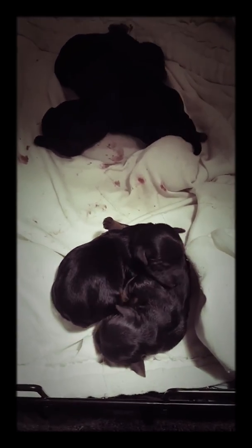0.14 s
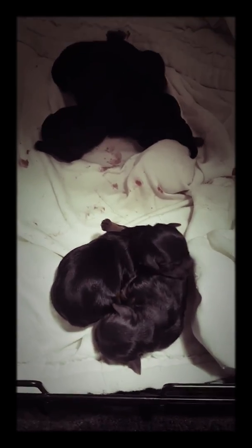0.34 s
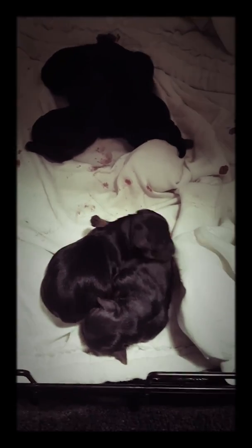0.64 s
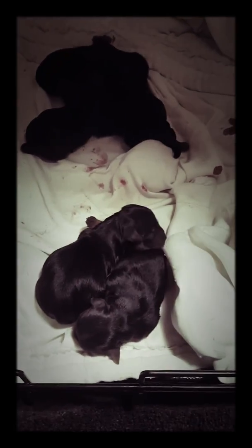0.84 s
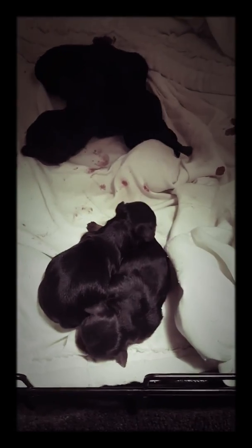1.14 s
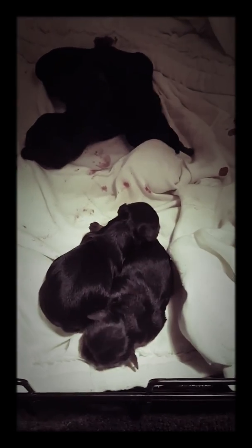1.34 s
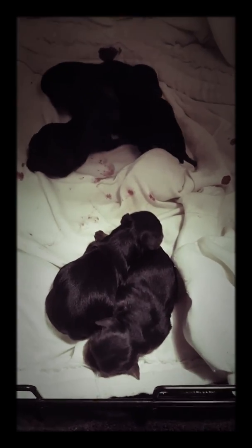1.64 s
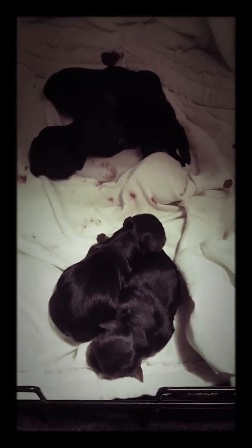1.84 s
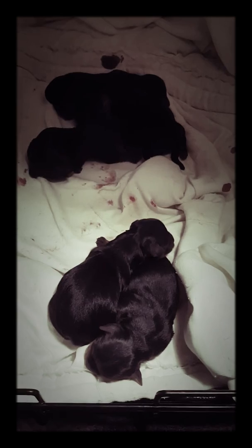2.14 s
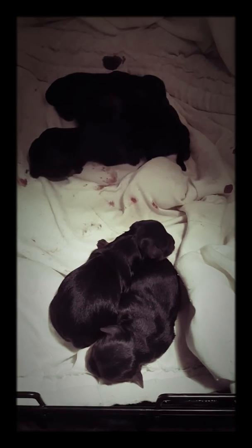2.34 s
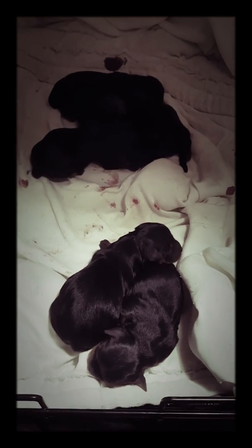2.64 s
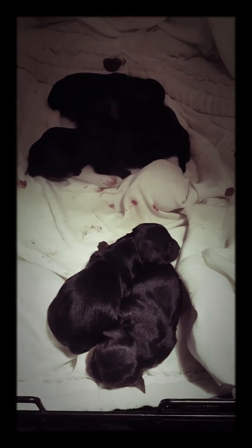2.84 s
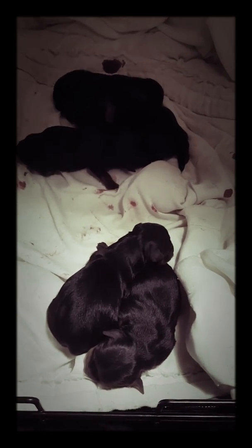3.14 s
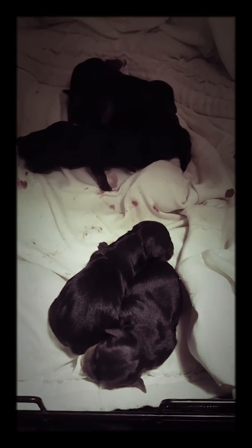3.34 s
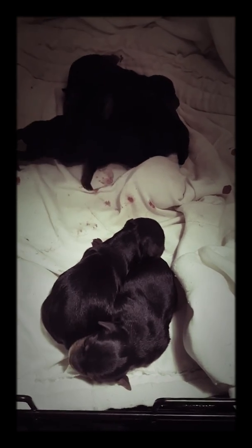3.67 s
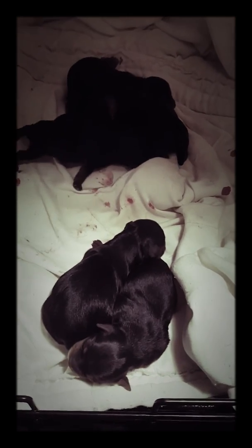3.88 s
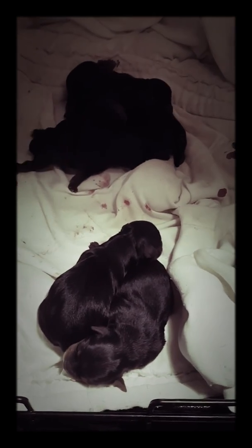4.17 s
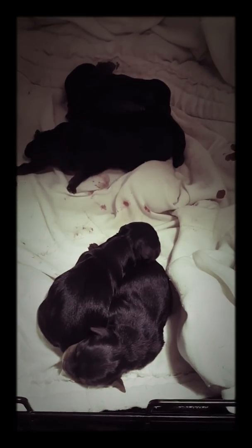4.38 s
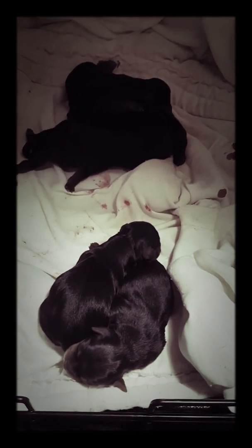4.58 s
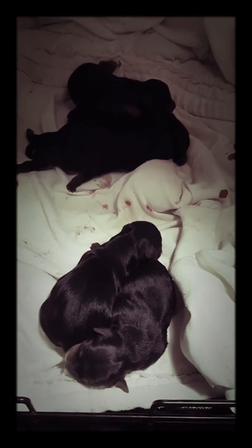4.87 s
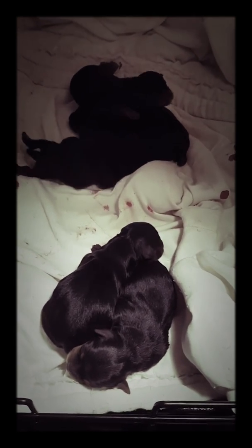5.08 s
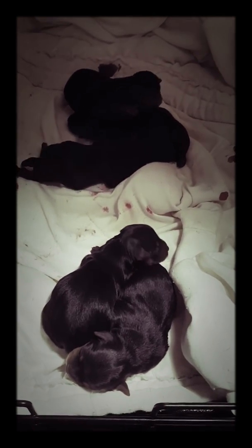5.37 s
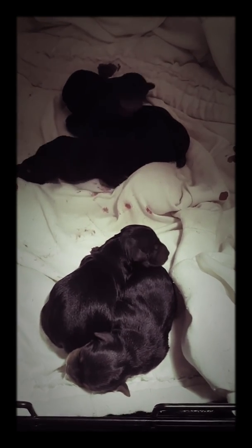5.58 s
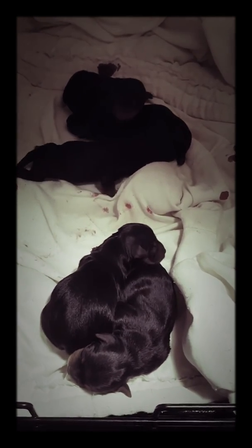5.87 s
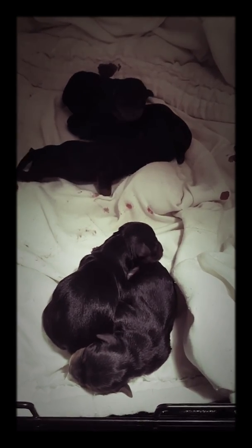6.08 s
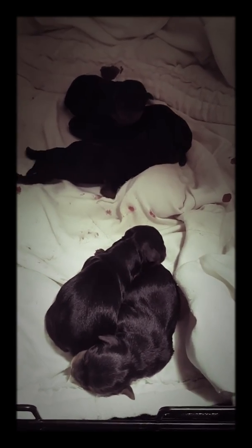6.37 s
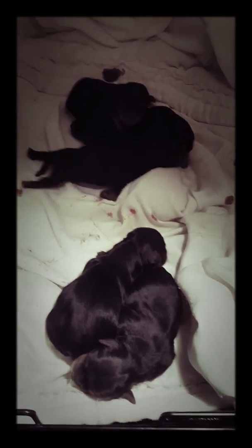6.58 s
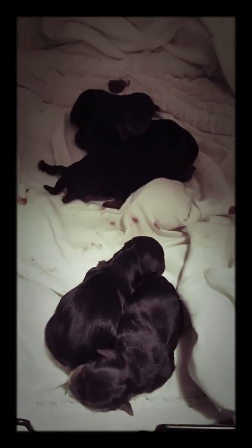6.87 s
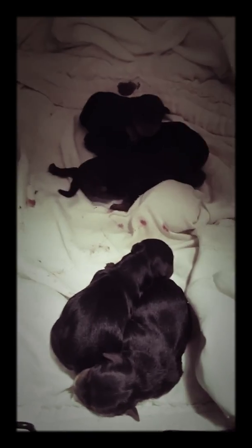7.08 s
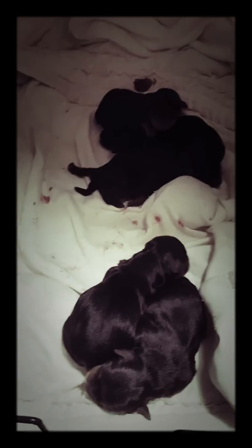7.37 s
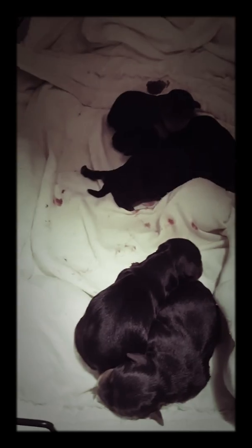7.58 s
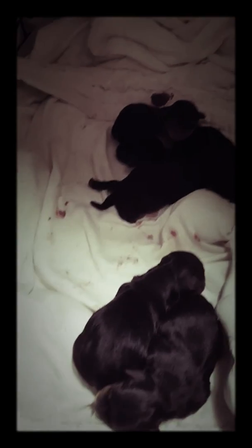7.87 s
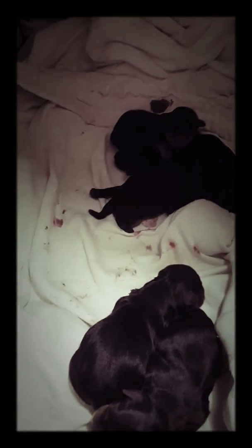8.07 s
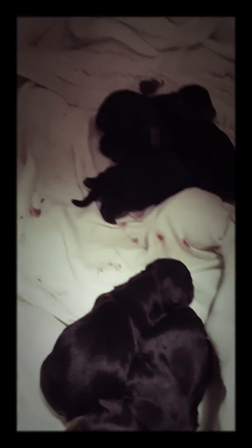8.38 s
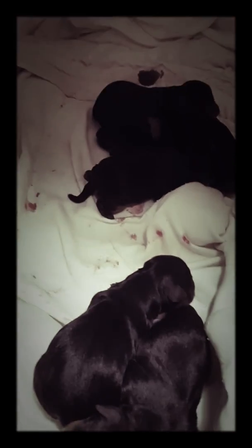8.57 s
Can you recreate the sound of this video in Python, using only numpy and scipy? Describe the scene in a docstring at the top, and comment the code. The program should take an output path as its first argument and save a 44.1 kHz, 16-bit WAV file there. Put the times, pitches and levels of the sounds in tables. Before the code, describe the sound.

A very young puppy whines in wavering whistle-like yelps, littermates chirping in briefly, close up in a quiet room with low hum and small thuds.

```python
"""One newborn puppy cries in gliding whistles that jump, split into half tones and break into rasp.
Littermates join in on bedding, an arm's length from a hand-held phone in a quiet room.
The voices are sums of partials weighted by a fixed colour; the rasps are uneven pulses ringing mouth and throat.
Bedding rustles as bursts of hiss, and bumps on the phone are ringing thuds with ticks.
Wavering mains hum, low rumble and wide room noise lie underneath."""
import sys
import numpy as np
from scipy import signal
from scipy.fft import rfft, irfft
from scipy.io import wavfile
from scipy.ndimage import uniform_filter1d, map_coordinates

SR = 44100
rng = np.random.default_rng(int(sys.argv[2]) if len(sys.argv) > 2 else 0)


def int16_out(signal):
    """Quantize to a 16-bit WAV file."""
    q = np.round(np.clip(np.atleast_2d(signal).T, -1, 1) * 32767)
    wavfile.write(sys.argv[1], SR, q.astype(np.int16))


def boost(x):
    """Linear amplitude factor 10**(x/20) for a level x in decibels (scalar or array-like)."""
    u = np.asarray(x, float) / 20
    return 10 ** u


N = 384552
T = np.arange(N) / SR
HZ = np.fft.rfftfreq(N, 1 / SR) + 1  # 1 Hz up, so that its logarithm exists


def on_log(hz, table):
    """Read a (Hz, value) table on a log-frequency axis."""
    table_hz, value = np.transpose(table)
    return np.interp(np.log(hz), np.log(table_hz), value)


def level(x, db):
    """Scale to an rms level in dB."""
    return x * boost(db) / np.sqrt(np.mean(x ** 2))


def noise(table):
    """Noise of rms 1 whose spectrum follows a (Hz, dB per Hz) table."""
    white = rng.standard_normal(N)
    return level(irfft(rfft(white) * boost(on_log(HZ, table)), N), 0)


def walk(rate):
    """Smooth chance that changes about rate times a second; rms 1."""
    k = max(int(SR / rate), 2)
    return level(uniform_filter1d(uniform_filter1d(rng.standard_normal(N), k), k), 0)


def envelope(tables, edge=0.00055):
    """Gain from (s, dB) tables, silent outside them, smoothed over edge seconds."""
    gain = np.zeros(N)
    for rows in tables:
        s, db = np.transpose(rows)
        a, b = int(s[0] * SR), int(s[-1] * SR)
        gain[a:b] += boost(np.interp(T[a:b], s, db))
    return uniform_filter1d(gain, int(edge * SR))


def glide(t, rows):
    """Smooth pitch through (s, Hz) rows by cubic pieces, level at each turning point."""
    s, hz = np.transpose(sorted(rows))
    step = np.maximum(np.diff(s), 1e-4)
    slope = np.diff(hz) / step
    # harmonic mean of the neighbouring slopes, zero where the pitch turns
    product = np.maximum(slope[1:] * slope[:-1], 0)
    inner = 2 * product / (slope[1:] + slope[:-1] + 1e-9)
    tangent = np.r_[slope[0], inner, slope[-1]]
    i = np.clip(np.searchsorted(s, t) - 1, 0, len(step) - 1)
    u = np.clip((t - s[i]) / step[i], 0, 1)
    bend = (1 - u) * (tangent[i] - slope[i]) - u * (tangent[i + 1] - slope[i])
    return hz[i] + step[i] * u * (slope[i] + (1 - u) * bend)


def voice(a, hz, db, rough, half, bright_db, tremble, shimmer, drift):
    """One whistle-like cry from sample a: partials on the pitch, weighted by the colour of the cries."""
    # Colour of the cries as heard: strongest near 1700 Hz, almost nothing around 5200 Hz.
    # Each row: Hz, relative dB.
    colour = [(450, -6), (800, 4), (1200, 10.5), (1700, 14), (2400, 7), (3200, 4), (3900, -2), (4700, -1.5),
              (5200, -36.5), (6800, -19), (12000, -73)]
    # Muzzles turn away from the phone. Each row: seconds, dB lost per octave of partials.
    dull = [(.2, 14.5), (.8, 2), (1.3, 16), (2.2, 7), (7.2, 8)]
    upper_db_per_octave, thin_hz = -4, 800  # above this pitch the partials from the third up thin out
    swell_db, fade_s = 2.5, .003
    b = a + len(hz)
    t = T[a:b]
    # rough folds wobble in period and in strength, and their pitch strays
    stray = rough * (.08 * tremble[a:b] + .1 * drift[a:b])
    phase = 2 * np.pi * np.cumsum(hz * (1 + stray)) / SR
    k = np.arange(1, 15)[:, None]  # partial numbers
    partial_db = on_log(k * hz, colour) + bright_db * (k > 1)
    partial_db += upper_db_per_octave * np.log2(np.maximum(hz / thin_hz, 1)) * (k > 2)
    partial_db -= np.interp(t[0], *np.transpose(dull)) * np.log2(k)
    # the mouth keeps moving, so each partial swells and fades by itself
    partial_db += swell_db * drift[(np.arange(a, b) + N // 37 * k) % N]
    size = boost(partial_db)
    wave = -np.sum(size * np.sin(k * phase), axis=0)
    wave = wave / np.sqrt(np.sum(size ** 2, axis=0) / 2)
    # strong-weak alternation of cycles adds half tones
    wave = wave * (1 + 2 * half * np.cos(phase / 2)) * (1 + rough * shimmer[a:b])
    fade = np.clip(np.minimum(t - t[0], t[-1] - t) / fade_s, 0, 1)
    return boost(db) * wave * fade


def voice_breaks():
    """Roughness and half-tone share over time, as the nearest voice slides out of its clear tone."""
    # Each row: start in seconds, length in seconds, roughness (0-1), share (0-1) of strong-weak alternation.
    breaks = [(.23, .04, .12, .2), (.275, .1, .22, .35), (.42, .12, .55, .3), (.97, .36, .1, .03),
              (1.33, .05, .12, .05), (1.5, .085, .4, .6), (1.585, .17, .14, .6), (1.76, .15, .16, .1),
              (4.52, .08, .04, .12), (4.715, .09, .04, .15), (4.88, .19, .16, .1), (5.515, .11, .18, .8),
              (5.63, .12, .1, .06), (5.97, .08, .2, .12), (6.13, .09, .22, .45), (6.22, .045, .35, .3),
              (6.27, .15, .12, .05), (6.63, .07, .18, .1), (6.73, .06, .14, 0), (6.8, .05, .25, .2),
              (7.18, .12, .2, .1), (7.4, .15, .1, .04), (7.78, .12, .16, .08), (7.9, .04, .08, .16),
              (7.95, .11, .14, .25), (8.06, .15, .12, .05), (8.495, .12, .3, .25)]
    clear_rough, clear_half, slide_s = .05, .01, .03
    rough, half = np.full(N, clear_rough), np.full(N, clear_half)
    for s, length, break_rough, break_half in breaks:
        a, b = int(s * SR), int((s + length) * SR)
        rough[a:b] = break_rough
        half[a:b] = break_half
    return uniform_filter1d([rough, half], int(slide_s * SR))


def nearest_puppy(wobble):
    """Gliding cries driven by effort, with brief surges that are louder and brighter or duller."""
    # One table a cry, each row a turning point: seconds, pitch in Hz.
    # Rows a few ms apart are a leap of register.
    pitch = [
        [(.15, 1004), (.19, 1236), (.228, 1554), (.261, 1530), (.3, 1100), (.345, 865)],
        [(.3, 612), (.369, 646.5), (.41, 817), (.432, 601), (.52, 514)],
        [(.795, 949), (.81, 1144), (.902, 1915), (.93, 1690), (.99, 676.4), (1.019, 545), (1.06, 582),
         (1.12, 542), (1.209, 753), (1.25, 732), (1.311, 797), (1.335, 736), (1.341, 626), (1.356, 657),
         (1.388, 580)],
        [(1.513, 434), (1.62, 457.4), (1.755, 429)],
        [(1.73, 529), (1.79, 641), (1.848, 738), (1.856, 592), (1.883, 636), (1.89, 810), (1.912, 760)],
        [(2.18, 802), (2.268, 1370), (2.274, 1512), (2.303, 1610), (2.307, 1147), (2.332, 1100), (2.369, 840),
         (2.405, 775)],
        [(2.67, 682), (2.719, 714), (2.778, 1153), (2.826, 1310), (2.83, 1526), (2.857, 1490), (2.861, 1120),
         (2.888, 1138), (2.93, 795)],
        [(3.215, 691), (3.249, 766), (3.349, 1488), (3.389, 1559), (3.42, 1502), (3.44, 1053), (3.47, 922),
         (3.525, 712)],
        [(3.772, 563), (3.798, 661), (3.893, 934), (4.009, 759), (4.122, 1055), (4.2, 927), (4.251, 958),
         (4.297, 859)],
        [(4.53, 750), (4.572, 860), (4.658, 1419), (4.663, 1572), (4.706, 1493), (4.712, 1240), (4.741, 1047),
         (4.801, 922), (4.881, 982), (4.931, 814), (4.979, 728), (5.06, 511)],
        [(5.305, 718), (5.329, 1270), (5.335, 1135), (5.392, 1380), (5.398, 1672), (5.461, 1908), (5.49, 1554),
         (5.518, 951), (5.552, 829), (5.618, 719), (5.678, 564), (5.718, 710), (5.755, 623)],
        [(5.97, 814), (5.985, 1180), (6.0, 1194), (6.047, 1359), (6.052, 1605), (6.099, 1719), (6.118, 1584),
         (6.143, 1022), (6.21, 742), (6.263, 595.5), (6.345, 460.6), (6.374, 621), (6.43, 756)],
        [(6.572, 1438), (6.589, 1058), (6.627, 1005)],
        [(6.64, 662), (6.675, 451), (6.7, 390)],
        [(6.738, 388), (6.77, 501), (6.823, 667), (6.829, 813), (6.875, 720)],
        [(7.082, 1184), (7.099, 1120), (7.133, 1202), (7.181, 1061), (7.22, 737), (7.252, 570)],
        [(7.24, 604), (7.281, 769), (7.32, 1030), (7.363, 1194), (7.41, 1087), (7.489, 687), (7.548, 632)],
        [(7.764, 1499), (7.773, 1090), (7.82, 1222), (7.841, 1163), (7.896, 1360), (7.901, 1603), (7.935, 1590),
         (7.941, 1235), (7.978, 1077), (8.02, 748), (8.06, 611), (8.167, 445.5), (8.21, 810)],
        [(8.404, 1507), (8.411, 1063), (8.463, 1246), (8.471, 1400), (8.51, 955), (8.551, 767), (8.59, 509),
         (8.621, 770), (8.665, 800)],
    ]
    # Each row, one a cry: effort in dB at start, middle and end, before the gains below;
    # then mouth opening as dB of the overtones at start and end.
    effort = [(-31, -46, -36, 17, 16), (-47.5, -41.5, -52, -17, 15.5), (-37.5, -43.5, -41, 5, 0.5),
              (-52.5, -57, -50.5, 6, -4), (-43.5, -41, -50.5, 10, -2.5), (-36.5, -33, -39, 1.5, -3),
              (-47, -32.5, -33.5, 2.5, -4), (-40, -32, -47, 5.5, 12.5), (-35, -32.5, -34, 0, 8.5),
              (-34.5, -36, -37.5, 7.5, 9.5), (-35.5, -41.5, -40.5, 8, 2.5), (-36, -37, -38, 6, 3),
              (-42, -41, -42, 6, 1), (-39, -45.5, -41, -5, 4), (-40, -46.5, -43, -2.5, -20),
              (-34, -42, -46, 4, 1), (-39, -33, -36.5, -2, -6), (-33.5, -39.5, -40, 8, -8),
              (-34.5, -41, -39.5, 8, -13.5)]
    # The same effort sounds loudest on notes near 1300 Hz. Each row: pitch in Hz, gain in dB.
    pitch_gain = [(450, -3), (1000, -3.5), (1300, 1.5), (1900, 0.5)]
    # Brief surges, each louder with brighter or duller overtones.
    # Each row: centre in seconds, louder by dB, overtones changed by dB.
    surges = [(0.236, 9, 13), (0.888, 4.5, 4.5), (3.307, 3.5, -1.5), (3.472, 13.5, -7.5), (3.941, 4.5, 6),
              (4.06, 2, 4), (4.279, 3.5, -11), (5.36, 2, -9), (5.694, 8, 3), (6.076, 8.5, -9),
              (7.125, 1, 3.5)]
    surge_s = 0.03
    attack_s, attack_db, release_s, release_db = 0.039, -7, 0.03, -7.5
    out = np.zeros(N)
    rough, half = voice_breaks()
    for rows, (first_db, mid_db, last_db, *mouth) in zip(pitch, effort):
        a, b = int(rows[0][0] * SR), int(rows[-1][0] * SR)
        t, u = T[a:b], np.linspace(0, 1, b - a)
        hz = glide(t, rows)
        db = np.interp(u, [0, .5, 1], [first_db, mid_db, last_db]) + on_log(hz, pitch_gain)
        surge_db, overtone_db = sum(np.outer(more, np.exp(-((t - s) / surge_s) ** 2)) for s, *more in surges)
        db += surge_db
        db += attack_db * np.clip(1 - (t - t[0]) / attack_s, 0, 1)
        db += release_db * np.clip(1 - (t[-1] - t) / release_s, 0, 1)
        bright_db = np.interp(u, [0, 1], mouth) + overtone_db
        out[a:b] += voice(a, hz, db, rough[a:b], half[a:b], bright_db, *wobble)
    return out


def short_cries(wobble):
    """Short cries by the same voice mechanism, swelling to one loudest moment: littermates' calls, plus a quick
    falling glide that opens the nearest puppy's cry near 0.76 s and a second, lower voice that puppy sounds
    beside its own near 6.06 s."""
    # Each row: level in dB at the loudest moment, mouth opening as dB of the overtones,
    # then the pitch as (seconds, Hz) with the loudest moment second.
    mates = [ (-42.5, 24, [(.24, 908), (.305, 868), (.35, 840)]), (-48, 9.5, [(.763, 1400), (.773, 1100),
             (.797, 900)]), (-43.5, -20, [(0.8, 577), (0.812, 688), (0.835, 750)]),
             (-35, 18.5, [(2.652, 2010), (2.665, 1175), (2.699, 1154), (2.707, 1113), (2.745, 1084)]),
             (-41, 14, [(3.245, 1656), (3.26, 1544), (3.285, 1590)]), (-47, -1, [(3.34, 830), (3.365, 673),
             (3.42, 442)]), (-36.5, 15.5, [(4.87, 1078), (4.895, 1405), (4.925, 1030)]),
             (-47.5, 14, [(5.3, 2170), (5.325, 1860), (5.4, 1260)]), (-46.5, -21, [(5.415, 604),
             (5.428, 710), (5.47, 970)]), (-45, 24, [(5.773, 1960), (5.781, 1760), (5.8, 1680)]),
             (-43, 10, [(5.797, 680), (5.815, 730), (5.823, 790)]), (-52, 0, [(6.06, 688), (6.09, 610),
             (6.135, 547)]), (-39, -8, [(7.78, 776), (7.836, 1100), (7.9, 850)]), ]
    fade_db, rough = -10.5, .07  # the fade is reached at both ends
    out = np.zeros(N)
    for peak_db, mouth, rows in mates:
        a, b = int(rows[0][0] * SR), int(rows[-1][0] * SR)
        start_peak_end = np.array(rows)[[0, 1, -1], 0]
        db = peak_db + fade_db * np.interp(T[a:b], start_peak_end, [1, 0, 1]) ** 2
        out[a:b] += voice(a, glide(T[a:b], rows), db, rough, 0, mouth, *wobble)
    return out


def puppies():
    """All the pitched cries, through a high-pass since so small a body hardly sounds low down."""
    chest_hz = 545
    wobble = (walk(410), walk(1500), walk(34))  # tremble, shimmer, drift
    cries = nearest_puppy(wobble) + short_cries(wobble)
    return signal.sosfilt(signal.butter(3, chest_hz, "high", fs=SR, output="sos"), cries)


def rasps():
    """Voice broken into pulses of uneven spacing and size that, with breath, ring the mouth and throat."""
    # Each row: start in seconds, length in seconds, level in dB at start and at end before the dropouts,
    # mouth resonance in Hz, nominal pulses per second.
    bursts = [(0.087, 0.1, -47.5, -48, 1920, 290), (0.261, 0.14, -42.5, -37.5, 1780, 390),
              (0.789, 0.03, -32.5, -47, 2070, 640), (1.331, 0.012, -38, -57, 1710, 360),
              (1.515, 0.37, -52, -59.5, 3700, 225), (2.15, 0.037, -58, -46, 1480, 270),
              (2.727, 0.06, -46, -53, 2625, 78), (3.275, 0.1, -38, -57.5, 2460, 640),
              (5.38, 0.057, -56, -35, 2360, 670), (5.772, 0.11, -44, -45, 2530, 370),
              (5.894, 0.074, -54, -51.5, 2380, 580), (6.568, 0.045, -45, -49, 2700, 560),
              (6.62, 0.024, -45, -47.5, 1740, 440), (6.709, 0.039, -51.5, -48, 1340, 190)]
    # Fixed resonances of the throat. Each row: Hz, width in Hz, relative dB.
    throat_modes = [(1100, 1130, -12), (3970, 960, -8.5)]
    scatter, drift_depth, breath = .05, .06, .6
    slow_hz = 500  # pulses slower than this come less evenly and with less breath
    out, catch = np.zeros(N), walk(140)
    for s, length, first_db, last_db, mouth_hz, rate in bursts:
        a, n = int(s * SR) - 512, 2 ** 15
        chance = rng.standard_normal((600, 3))
        drift = 4 * uniform_filter1d(chance[:, 2], size=16)
        uneven = scatter * slow_hz / rate * chance[:, 0] + drift_depth * drift
        at = np.cumsum(SR / rate * np.exp(uneven)).astype(int)
        at += int(s * SR) - a - at[0]  # first pulse on the start
        push = np.zeros(n)
        push[at[at < n]] = boost(2.0 * chance[at < n, 1])
        push = level(push - push.mean(), 0)
        push = push + breath * np.sqrt(rate / slow_hz) * rng.standard_normal(n)
        hz = np.fft.rfftfreq(n, 1 / SR)
        modes = [throat_modes[0], (mouth_hz, 650, 0), throat_modes[1]]
        # resonances alternate in sign
        throat = sum(boost(db) / (1 + 2j * (hz - f) / w) * (-1) ** i for i, (f, w, db) in enumerate(modes))
        # loses the lows and the treble
        slopes = hz ** 2 / (hz ** 2 + 93.0 ** 2) / (1 + (hz / 2600.0) ** 2)
        wave = level(irfft(rfft(push) * throat * slopes, n), 0)[:N - a]
        # the rasp catches and drops out for moments, more so when fast
        wave = wave * boost(-7 * rate / slow_hz * np.maximum(catch[a:a + n], 0))
        out[a:a + n] += wave * envelope([[(s, first_db), (s + length, last_db)]])[a:a + n]
    return out


def rustles():
    """Bedding rubbed by a moving body: flickering cloth hiss, wide enough to differ at the two ports."""
    # Each row: start in seconds, length in seconds, peak dB in the band below, before flicker and smoothing.
    rubs = [(4.078, 0.033, -60), (4.112, 0.02, -62), (4.15, 0.014, -64), (4.41, 0.015, -88),
            (6.953, 0.13, -54), (7.084, 0.12, -61), (7.179, 0.062, -58.5), (7.308, 0.12, -58)]
    # Colour of the cloth. Each row: Hz, relative dB per Hz.
    cloth = [(240, -57), (400, 3.5), (987, 18.5), (2590, 23.5), (3360, 10.5), (5000, 6.5), (9000, -9),
             (15500, -13.5)]
    band_hz = 4500, 7500
    rise, edge_db = 0.44, -13.5  # share of the length spent swelling; level at both ends against the peak
    swells = []
    for s, length, db in rubs:
        swells.append([(s, db + edge_db), (s + rise * length, db), (s + length, db + edge_db)])
    hiss = noise(cloth) + 1.03 * noise(cloth) * np.array([[1], [-1]])
    band = signal.sosfilt(signal.butter(4, band_hz, "band", fs=SR, output="sos"), hiss)
    flicker = boost(1.8 * walk(330))
    return hiss / np.std(band) * flicker * envelope(swells, edge=0.011)


def ports(x):
    """The two microphone ports colour a source differently; the right one hears it later."""
    # Each row: Hz, left minus right in dB.
    port_db = [(500, -5), (1300, 1.5), (2400, -8.5), (4500, -9)]
    # The hand turns the phone. Each row: seconds, lag of the right port in samples, left minus right in dB.
    aim = [(0, 2.8, 5.5), (1.2, 9.8, -5.5), (1.6, 3.6, 5.5), (4.5, 4.89, 4), (6.301, 3, 7.5),
           (7.402, 2.16, 10.5), (7.8, 1.7, 6), (8.7, 2.3, 6)]
    tilt = boost(on_log(HZ, port_db) / 2)
    left, right = irfft(rfft(x) * np.array([tilt, 1 / tilt]), N)
    s, lag, pan_db = np.transpose(aim)
    right = map_coordinates(right, [np.arange(N) - np.interp(T, s, lag)], order=3)
    return np.array([left, right]) * boost(np.interp(T, s, pan_db) * np.array([[.5], [-.5]]))


def room(x):
    """A short dull tail of decaying noise, unrelated left and right."""
    t60_s, tail_db, top_hz = 0.14, -17, 2470
    t = T[:int(.4 * SR)]
    tail = rng.standard_normal((2, len(t))) * boost(-60 * t / t60_s) * (t > .004)
    tail = signal.lfilter(*signal.butter(1, top_hz, fs=SR), tail)
    tail = tail / np.sqrt(np.sum(tail ** 2) / 2)
    return boost(tail_db) * signal.fftconvolve(x[None], tail, axes=1)[:, :N]


def bumps():
    """Each bump rings the hand and case in a low thud and adds a short tick, nearer the right port."""
    # Each row: start in seconds, thud level in dB before rise and decay, tick in dB against the thud,
    # thud decay T60 in seconds (held to .02-.45 below), thud pitch in Hz.
    knocks = [(1.832, -26, -29.5, 0.05, 340), (2.022, -41, -31, 0.015, 393), (2.262, -41.5, -20, 0.16, 176),
              (2.424, -24.5, -53, 0.031, 180), (2.428, -37.5, -47, 0.53, 82),
              (3.583, -48.5, -23, 0.088, 504), (4.052, -37.5, -31, 0.085, 260),
              (6.939, -42.5, -23, 0.032, 596), (7.334, -41, -26, 0.11, 337), (7.444, -38.5, -16, 0.11, 206),
              (7.736, -34, -25.5, 0.052, 377), (7.854, -24.5, -2.5, 0.04, 654),
              (8.345, -51.5, -32, 0.092, 211)]
    # Colour of the tick. Each row: Hz, relative dB per Hz.
    tick_colour = [(500, -10.5), (1200, -17.5), (4500, 3), (8500, -17), (15500, -20.5)]
    tick_t60_s, thud_rise_s = .018, .002
    tick_peak_s = .003  # after the start of the bump
    out, t = np.zeros((2, N)), T[:int(.4 * SR)]
    shake, tick = rng.standard_normal((2, N)), noise(tick_colour)
    for s, db, tick_db, t60, hz in knocks:
        a = int(s * SR)
        n = min(len(t), N - a)
        ring = signal.butter(2, [hz / 1.8, hz * 1.8], "band", fs=SR, output="sos")
        # 2000 samples of run-in let the filter settle
        low = signal.sosfilt(ring, shake[:, a - 2000:a + n])[:, 2000:]
        thud = level(low[0] + 0.43 * low[1] * np.array([[1], [-1]]), 0)
        thud = thud * boost(-60 * t[:n] / np.clip(t60, .02, .45))
        thud = thud * np.clip(t[:n] / thud_rise_s, 0, 1)
        # the tick peaks in one short inward snap
        snap = 5.5 * np.exp(-((t[:n] - tick_peak_s) / .00015) ** 2)
        high = boost(tick_db) * (tick[a:a + n] - snap)
        high = high * boost(-60 * np.abs(t[:n] - tick_peak_s) / tick_t60_s)
        out[:, a:a + n] += boost(db) * (thud + high * np.array([[.6], [1.4]]))
    return out


def background():
    """Mains hum that wavers a little, low rumble and room noise that widens towards the treble."""
    # Mains hum. Each row: Hz, mean rms level in dB.
    mains = [(60, -57), (120, -89)]
    # Room noise. Each row: Hz, relative dB per Hz.
    air_colour = [(53, -48.5), (100, -5.5), (400, -17.5), (870, -23), (1500, -25.5), (2200, -27.5),
                  (3500, -34.5), (5500, -35.5), (9000, -43.5), (12500, -40), (15700, -37)]
    # Width of the room noise. Each row: Hz, side minus mid in dB.
    air_side = [(60, -12), (250, -3), (10000, 0.5)]
    rumble_db, air_db = -67.5, -62.5
    hum = 0
    for f, db in mains:
        hum = hum + np.sqrt(2) * boost(db + .8 * walk(8)) * np.sin(2 * np.pi * f * T + f)
    rumble = boost(rumble_db) * noise([(15, -47.5), (45, -4), (70, -0.5), (110, -39.5), (200, -56.5)])
    air = [(40, -61.5)] + list(air_colour)
    side = irfft(rfft(noise(air)) * boost(on_log(HZ, air_side)), N)
    swell = boost(air_db + 1.0 * walk(0.79))
    wide = noise(air) + side * np.array([[1], [-1]])
    return hum + rumble + swell * wide * np.array([[.9], [1.1]])  # air a little louder on the right


def scene():
    """Litter through the ports and the room, over bumps and background."""
    litter = puppies() + rasps() + rustles()
    return ports(litter) + room(litter.mean(axis=0)) + bumps() + background()


def roll_off(x):
    """The treble ends steeply here."""
    return signal.sosfilt(signal.butter(12, 15870, fs=SR, output="sos"), x)


def record(dry):
    """The phone's converter adds a slight constant offset."""
    mix = dry - .0006
    return roll_off(mix)


dry = scene()
out = record(dry)
int16_out(out)
```